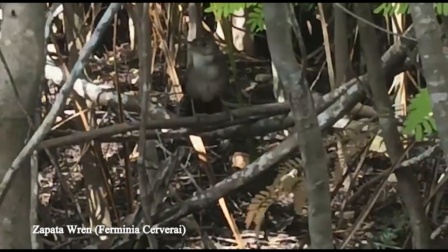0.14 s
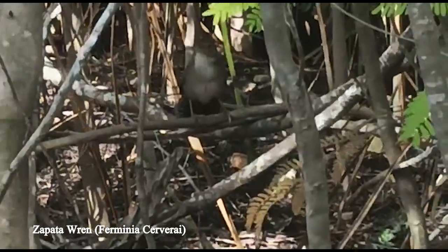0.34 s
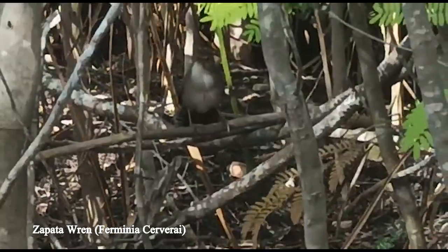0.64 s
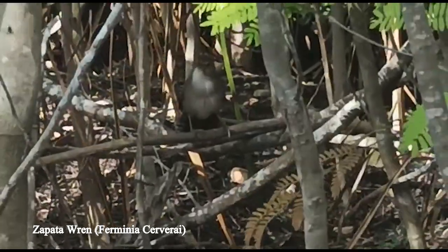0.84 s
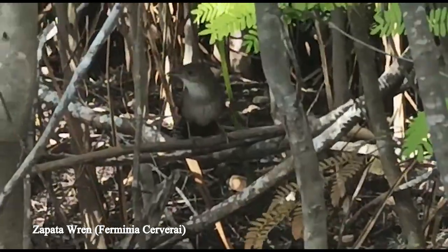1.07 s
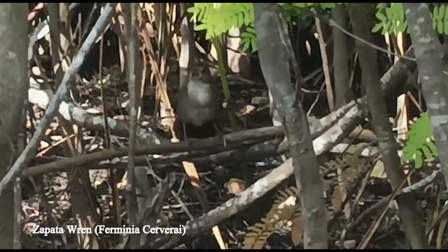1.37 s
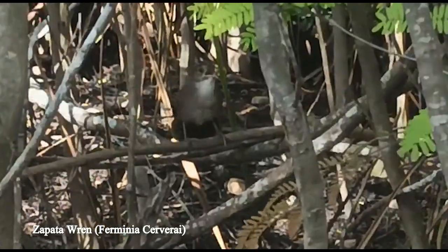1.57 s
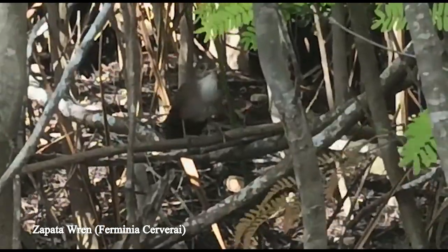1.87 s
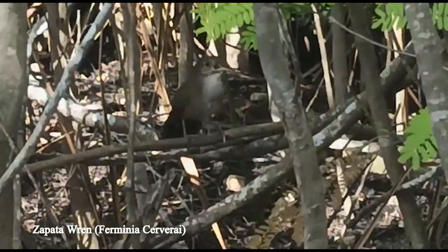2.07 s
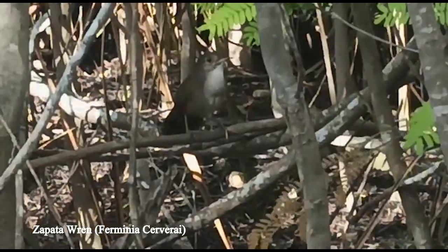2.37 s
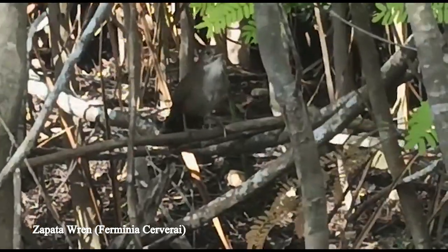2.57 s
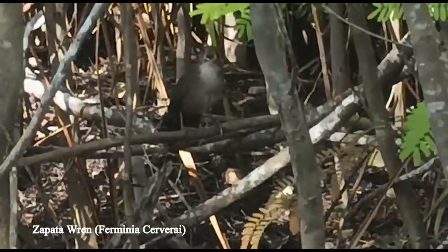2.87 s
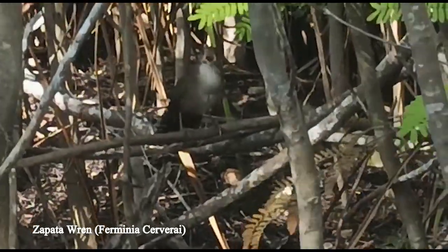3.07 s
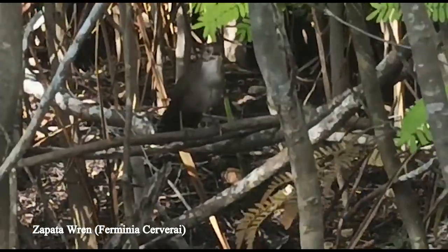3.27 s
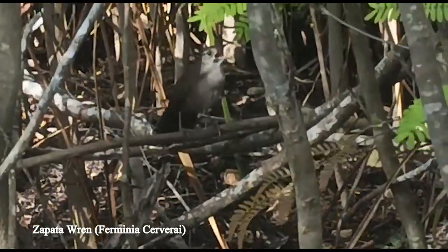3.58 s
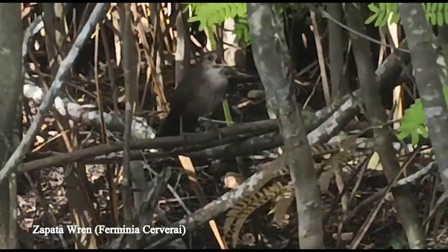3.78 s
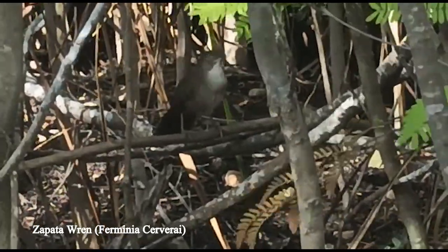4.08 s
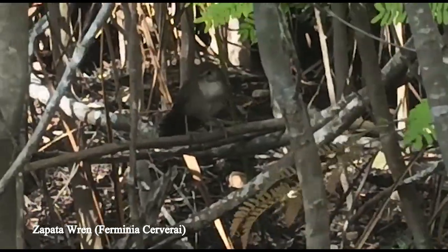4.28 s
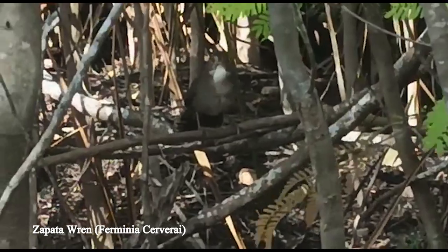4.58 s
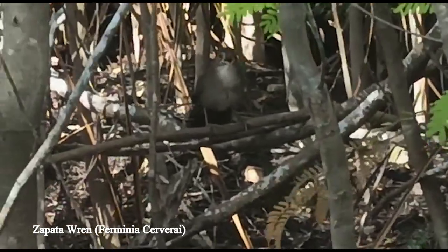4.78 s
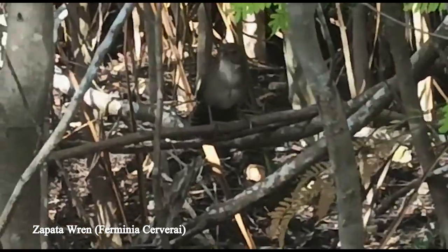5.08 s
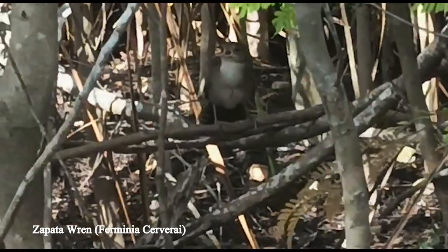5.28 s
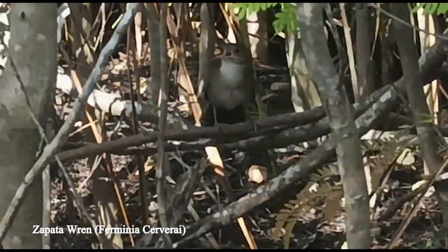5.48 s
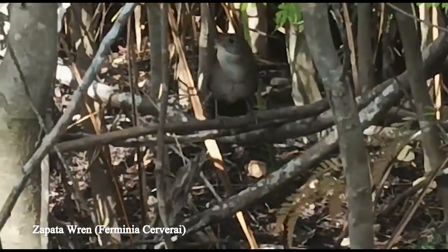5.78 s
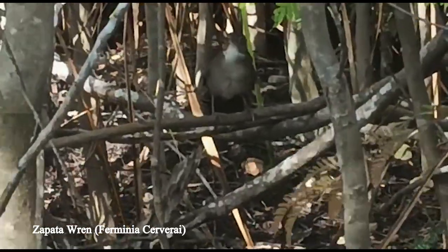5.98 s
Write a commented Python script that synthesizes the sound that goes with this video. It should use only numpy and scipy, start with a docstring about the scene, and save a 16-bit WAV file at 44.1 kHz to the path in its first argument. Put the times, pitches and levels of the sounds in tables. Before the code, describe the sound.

A small songbird close to the microphone in dry woodland. A reedy falling note and a rising whistle come first, then a rapid rattle of a dozen harsh pulses. After a pause come a nasal note, two falling whistles, two rasping buzzes, another pause, a reedy squeak, a dropping whistle, a purring trill and two sharp swoops. Dry twig ticks, faint hiss and low rumble surround it.

```python
"""In a dry thicket a small bird sings close by: whistles, reedy notes, a rattle, two buzzes and a trill.
Whistles and reedy notes are sums of gliding harmonics; rasp and buzz are dense random clicks, filtered
and gated; the rattle and trill mix both. Dying sines make twig ticks. Branches throw short echoes and a
brief tail. Shaped noise gives distant rumble and a faint insect-like hiss, with two soft thuds."""
import sys
import numpy as np
from scipy import signal
from scipy.fft import rfft, irfft, next_fast_len
from scipy.io import wavfile
from scipy.ndimage import uniform_filter1d

SR = 44100
rng = np.random.default_rng(int(sys.argv[2]) if len(sys.argv) > 2 else 0)


def persist_wave(psi):
    """Save psi, clipped to +-1, as 16-bit WAV."""
    counts = np.round(np.clip(psi, -1, 1) * 32767).astype(np.int16)
    wavfile.write(sys.argv[1], SR, np.atleast_2d(counts).T)


N = 270774
T = np.arange(N) / SR
CUTOFF_HZ = 15800   # harmonics above this are left out

# spectrum of the harsh flutter in rattle and trill: frequency_hz, relative_density_db (dB per Hz)
RASP_SPECTRUM = [(760, -60), (1300, -55), (2450, -13.5), (2780, -26), (3500, -8.5), (5700, 1.5), (6880, 4),
                 (8290, -9.5), (10300, -25), (15600, -29.5)]


def from_db(db):
    """Level in decibels to amplitude ratio."""
    return 10 ** (np.asarray(db) / 20)


def rms_one(x):
    """Normalise the mean power: scale to rms 1."""
    return x / np.sqrt(np.mean(x ** 2) + 1e-20)


def at_hz(points, hz):
    """Interpolate a spectrum in decibels over logarithmic frequency."""
    point_hz, point_db = np.transpose(points)
    return np.interp(np.log(np.maximum(hz, 1)), np.log(point_hz), point_db)


def coloured(x, points):
    """Linear filtering: multiply the spectrum of x by a magnitude curve."""
    size = next_fast_len(N)
    gain = from_db(at_hz(points, np.fft.rfftfreq(size, 1 / SR)))
    return irfft(rfft(x, size) * gain, size)[..., :N]


def drift(rate_hz, size):
    """Band-limited random fluctuation: low-passed white noise of rms 1."""
    settle = 2000   # samples dropped while the filter settles
    white = rng.standard_normal(size + settle)
    return rms_one(signal.lfilter(*signal.butter(2, rate_hz, fs=SR), white)[settle:])


def span(rows, fade_s=0.0052):
    """Piecewise-linear contours: sample range, edge fade and interpolated columns of one note."""
    s, *columns = np.transpose(rows)
    at = slice(round(s[0] * SR), min(round(s[-1] * SR), N))
    since_start = T[at] - s[0] + (s[0] < fade_s)   # no fade-in for a note already sounding at time zero
    fade = np.clip(np.minimum(since_start, s[-1] - T[at]) / fade_s, 0, 1)
    return at, fade, [np.interp(T[at], s, c) for c in columns]


def smooth_glide(hz):
    """Continuity of pitch: a 5 ms moving average rounds the corners of a contour."""
    return uniform_filter1d(hz, size=220, mode="nearest")


def throb(first_s, per_s, hurry, shape, t, jitter):
    """Periodic modulation: a template repeated on a beat that settles to a steady rate."""
    gained, within_s = hurry
    counted = per_s * (t - first_s) + gained * (1 - np.exp(-(t - first_s) / within_s))
    share = (counted + jitter + .5) % 1 - .5
    template_share, *columns = np.transpose(shape)
    return [np.interp(share, template_share, c) for c in columns]


def partials(pitch_hz, gains, waver):
    """Harmonic series: sines at multiples of one wavering pitch, power normalised by the gains."""
    phase = 2 * np.pi * np.cumsum(pitch_hz * (1 + waver * drift(160, len(pitch_hz)))) / SR
    tones = 0
    for k, gain in enumerate(gains, 1):
        tones = tones + gain * np.sin(k * phase) * (k * pitch_hz < CUTOFF_HZ)
    return tones / np.sqrt(sum(gain ** 2 for gain in gains) / 2)


def chaos(spectrum):
    """Chaotic flutter of the syrinx: dense uneven clicks, filtered, with the short-term power evened out."""
    click_here = rng.random(N) < 9000 / SR   # about 9000 clicks per second
    clicks = click_here * from_db(2 * rng.standard_normal(N)) * rng.choice([-1, 1], N)
    flutter = coloured(clicks, spectrum)
    return rms_one(flutter / np.sqrt(uniform_filter1d(flutter ** 2, size=60)))


def fall(start, slide, end, start_hz, top_hz, low_hz, slide_s, db):
    """Exponential approach to a held pitch, then a hyperbolic-secant slide; one row a millisecond."""
    # loudness along the slide: share_still_to_go, level_db
    loudness = [(0, 0.5), (.1, 5), (.3, 0.5), (.45, -5), (.8, -0.5), (1, -1)]
    climb_s = 0.02
    s = np.arange(start, end, .001)
    held = top_hz - (top_hz - start_hz) * np.exp(-(s - start) / climb_s)
    to_go = 1 / np.cosh(np.maximum(s - slide, 0) / slide_s)
    pitch_hz = low_hz + (held - low_hz) * to_go
    return np.transpose([s, pitch_hz, db + np.interp(to_go, *np.transpose(loudness))])


def swoop(plunge, rise, start_hz, db):
    """Time scaling: lead-in pip and rise stretch to their own length, the plunge and rebound do not."""
    # level pip at the start pitch: share_of_rise_still_to_go, relative_level_db
    pip = [(0.97, -4), (.91, -6.5), (.84, -20)]
    # climb to the peak: share_of_rise_still_to_go, pitch_hz, relative_level_db
    climb = [(.76, 5650, 2), (0.45, 6700, 1), (.28, 7210, -4.5), (0.13, 7200, -15)]
    # plunge and rebound: after_plunge_s, pitch_hz, relative_level_db
    drop = [(0, 6890, 2), (.006, 4820, -1), (.013, 3010, -6.5), (.022, 2404, -16.5), (.034, 2020, -16),
            (.054, 2286, -19), (.074, 2490, -6), (.088, 2475, -6.5), (.106, 2500, -22)]
    lead_in = [(share, start_hz, pip_db) for share, pip_db in pip]
    up = np.multiply(lead_in + climb, [-rise, 1, 1])
    return np.vstack([up, drop]) + [plunge, 0, db]


def whistles():
    """Nearly pure tones: frequency-modulated harmonic series with weak overtones."""
    # a scoop and a sag, one list a note: time_s, pitch_hz, level_db
    single_whistles = [
        [(0.288, 3340, -21), (0.315, 3250, -20.5), (0.345, 3080, -21), (0.37, 3187, -20), (0.406, 3616, -18),
         (0.438, 3944, -22.5), (0.468, 4680, -26)],
        [(5.013, 4130, -30.5), (5.02, 2970, -33), (5.028, 3250, -18), (5.076, 2898, -23.5),
         (5.146, 2686, -25.5), (5.192, 2460, -32), (5.218, 2300, -54)],
    ]
    # falling whistles: start_s, slide_s, end_s, start_hz, top_hz, low_hz, slide_time_s, level_db
    falling_whistles = [(2.896, 3.016, 3.134, 5154, 5704, 3054, 0.025, -22),
                        (3.197, 3.268, 3.402, 5280, 5524, 3047, 0.037, -21)]
    # swoops that rise, plunge and rebound: plunge_s, rise_s, start_hz, level_db
    swooping_whistles = [(5.854, 0.08, 5340, -20.5), (6.086, 0.069, 5080, -18.5)]
    # partials 1 to 6: relative_level_db
    overtones_db = [2, -36.5, -42.5, -53.5, -38.5, -47]
    out = np.zeros(N)
    contours = single_whistles + [fall(*row) for row in falling_whistles]
    contours += [swoop(*row) for row in swooping_whistles]
    for rows in contours:
        at, fade, (hz, db) = span(rows)
        out[at] += fade * from_db(db) * partials(smooth_glide(hz), from_db(overtones_db), waver=.003)
    return out


def throat(pitch_hz, centre_hz, level_db, count=15):
    """Source and filter: a falling series through a tuned throat, plus the beak's bright resonance."""
    # thin resonance growing with effort: centre_hz, width_hz, level_db, growth (dB per dB)
    beak = (12996, 2802.5, -48.5, 0.5)
    q, slope_db = 4.22, -2.5   # throat sharpness, fall per partial
    beak_hz, width_hz, beak_db, effort = beak
    bright = from_db(beak_db + effort * (level_db + 25))
    gains = []
    for k in range(1, count + 1):
        r = k * pitch_hz / centre_hz
        tuned = from_db(slope_db * (k - 2.0)) * r / (q ** 2 * (1 - r * r) ** 2 + r * r)
        gains.append(tuned + bright * np.exp(-((k * pitch_hz - beak_hz) / width_hz) ** 2))
    return gains


def reedy_notes():
    """Moving formant: a rich harmonic series whose throat resonance glides apart from its pitch."""
    # one list a note: time_s, pitch_hz, level_db, throat_resonance_hz
    reedy_contours = [
        [(0.0, 2303, -31, 4570), (0.03, 2010, -27.5, 4200), (0.046, 1645, -21.5, 3370),
         (0.062, 1374, -33, 2880), (0.11, 1357, -27.5, 2740), (0.136, 1381, -44, 2760)],
        [(2.546, 1064, -41, 3800), (2.559, 1291, -24.5, 3930), (2.634, 1107, -28.5, 3420),
         (2.668, 1057, -25, 3250), (2.685, 1035, -29.5, 3410), (2.78, 1022, -32.5, 3420),
         (2.798, 975, -33, 3240), (2.81, 865, -36, 2970)],
        [(4.638, 1027, -45.5, 3770), (4.65, 1264, -35, 4500), (4.664, 1395, -30, 4130),
         (4.698, 1321, -32, 3150), (4.714, 1435, -47.5, 2480), (4.736, 2050, -39, 2060),
         (4.748, 2080, -37, 2120), (4.786, 2295, -40.5, 3800), (4.838, 2257, -30.5, 4760),
         (4.862, 2305, -29, 4200), (4.896, 2383, -30.5, 4320), (4.914, 2450, -42, 4450)],
    ]
    out = np.zeros(N)
    for rows in reedy_contours:
        at, fade, (hz, db, centre) = span(rows)
        glide = smooth_glide(hz)
        out[at] += fade * from_db(db) * partials(glide, throat(glide, centre, db), waver=.002)
    return out


def creaks():
    """Random amplitude and frequency modulation: a lumpy tone between the partials of a note."""
    # rough creaks inside notes: start_s, end_s, pitch_hz, level_db
    creak_rows = [(2.592, 2.644, 2940, -44.5), (4.759, 4.888, 3620, -49.5)]
    out = np.zeros(N)
    for start, end, hz, db in creak_rows:
        at, fade, _ = span([(start,), (end,)], fade_s=0.022)
        lumpy = from_db(db + 4.0 * drift(150, len(fade)))
        out[at] = fade * lumpy * partials(hz + 0 * fade, [1], waver=0.083)
    return out


def rattle():
    """Tone and noise in sequence: a lumpy rising "tuk", then a "tsh" of flutter; a second voice falls in both."""
    # syllables: tuk_s, tuk_level_db, tuk_pitch_hz, tsh_delay_ms
    syllables = [(1.3386, -22, 4150, 24.2), (1.413, -19, 3570, 26.8), (1.4928, -17.5, 3650, 27.6),
                 (1.5727, -16.5, 3534, 28), (1.653, -16.5, 3470, 28.6), (1.733, -16.5, 3450, 29.8),
                 (1.81, -16, 3490, 27.7), (1.8893, -16, 3650, 29), (1.9665, -16.5, 3483, 29),
                 (2.0527, -15.5, 3525, 28.7), (2.1322, -18, 3490, 29.6), (2.2211, -17.5, 3480, 29.8)]
    # contour of a tuk: time_s, relative_level_db, pitch_ratio
    tuk_shape = [(-.002, -33, 0.924), (-.0002, -6.5, 1.002), (.0015, -3, 0.997), (.0032, -14.5, 0.98),
                 (.005, -9, 1.0), (.01, -4.5, 1.02), (.013, -14, 1.1), (.017, -28, 1.15)]
    # flutter within a tuk: frequency_hz, relative_density_db (dB per Hz)
    tuk_spectrum = [(1200, -55), (2000, -11), (3300, 3.5), (4400, -4), (5600, -8.5), (7500, -23),
                    (9500, -26), (13000, -27), (15700, -61)]
    # contour of a tsh: time_s, relative_level_db
    rasp_shape = [(-.002, -12.5), (.001, -5.5), (.005, -4), (.014, -11.5), (.021, -24), (.026, -40)]
    # second voice: time_s, level_db, pitch_hz
    hook_shape = [(-.002, -42, 3800), (0, -30.5, 3350), (.003, -39.5, 2750), (.007, -44.5, 2253),
                  (.014, -52.5, 1700), (.02, -62, 1670)]
    wobble_hz, wobble_depth = 394, 0.23
    tuk_flutter_db, rasp_db = -9.5, -17.5
    out, low, high = np.zeros((3, N))
    for s, tuk_db, hz, after_ms in syllables:
        at, fade, (db, ratio) = span(np.add(tuk_shape, [s, tuk_db, 0]), fade_s=0.0014)
        wobble = 1 + wobble_depth * np.sin(2 * np.pi * wobble_hz * (T[at] - s))
        lumps = wobble * from_db(1.5 * drift(369.4, len(db)))
        tone = partials(hz * ratio, from_db([0, -24, -38]), waver=0.032)
        out[at] += fade * lumps * from_db(db) * tone
        low[at] += fade * from_db(db + tuk_flutter_db)
        rasp = s + after_ms / 1000
        at, fade, (db,) = span(np.add(rasp_shape, [rasp, rasp_db]), fade_s=0.00067)
        high[at] += fade * from_db(db)
        for half in (s, rasp):
            at, fade, (db, hook_hz) = span(np.add(hook_shape, [half, 0, 0]), fade_s=0.00114)
            out[at] += fade * from_db(db) * partials(hook_hz, [1], waver=0.039)
    return out + low * chaos(tuk_spectrum) + high * chaos(RASP_SPECTRUM)


def buzzes():
    """Amplitude modulation: flutter gated about 65 times a second under attack, slight sag and release."""
    # buzzes: start_s, end_s, level_db, first_throb_s, throbs_per_s
    buzz_rows = [(3.466, 3.71, -21, 3.4757, 64.7), (3.759, 4.003, -20.5, 3.7672, 63.0)]
    # one throb: share_of_throb, relative_level_db
    throb_shape = [(-.5, -20), (-.3, -14.5), (-.22, -2), (.1, 0), (.3, -13), (.4, -20), (.5, -18)]
    # flutter: frequency_hz, relative_density_db (dB per Hz)
    buzz_spectrum = [(800, -76), (1400, -46), (1900, -21.5), (2600, -16.5), (3300, -13.5), (4100, -13),
                     (4900, -12.5), (7250, 3), (8500, -6.5), (9500, -22.5), (10400, -31.5), (13700, -29.5),
                     (15600, -35)]
    # the first throbs come quicker: throbs_gained, within_s
    hurry = (0.2, 0.024)
    attack_s, release_s, edge_db, sag_db = 0.014, 0.019, -7.5, -1.5
    envelope = np.zeros(N)
    for start, end, level_db, first_s, per_s in buzz_rows:
        at, fade, (db,) = span([(start, edge_db), (start + attack_s, 0),
                                (end - release_s, sag_db), (end, edge_db)])
        throb_db = throb(first_s, per_s, hurry, throb_shape, T[at], jitter=0)[0]
        envelope[at] = fade * from_db(level_db + db + throb_db)
    return envelope * chaos(buzz_spectrum)


def trill():
    """Joint amplitude and pitch modulation: a reedy voice throbs at about 107 Hz, most fluttery at its ends."""
    # whole trill: time_s, pitch_hz, level_db, flutter_db (held to 0 at most)
    contour = [(5.274, 1830, -34.5, 1), (5.3, 1754, -28.5, -6), (5.33, 1740, -28, -13),
               (5.45, 1705, -27.5, -22), (5.64, 1738, -28, -16), (5.674, 1795, -28, -3.5),
               (5.702, 1843, -33, -14)]
    # loudness of one throb: share_of_throb, relative_level_db
    throb_shape = [(-.5, -22), (-.3, -23), (-.12, 2), (0.098, 4), (0.298, 0.5), (.5, -27)]
    # pitch of one throb, mostly falling: share_of_throb, pitch_ratio
    bend_shape = [(-.5, .98), (-.38, 1.05), (-.15, 1.04), (.1, .99), (.33, .91), (.5, .98)]
    # partials 1 to 8: relative_level_db
    overtones_db = [-17, -2.5, 5.5, -2.5, -38, -40, -25.5, -29]
    # the first throbs come slower: throbs_gained, within_s
    hurry = (-1.42, 0.04)
    first_s, per_s = 5.2793, 107.8
    out = np.zeros(N)
    at, fade, (hz, db, flutter_db) = span(contour)
    jitter = 0.036 * drift(50, len(hz))   # in throbs
    throb_db = throb(first_s, per_s, hurry, throb_shape, T[at], jitter)[0]
    ratio = throb(first_s, per_s, hurry, bend_shape, T[at], jitter)[0]
    ratio *= 1 + .007 * drift(45, len(hz))   # no two throbs on quite the same pitch
    voice = partials(hz * ratio, from_db(overtones_db), waver=.006)
    voice += from_db(np.minimum(flutter_db, 0)) * chaos(RASP_SPECTRUM)[at]
    out[at] = fade * from_db(db + throb_db + 1.5 * drift(50, len(hz))) * voice
    return out


def twigs():
    """Damped modal vibration: each dry tick is two quickly dying wood modes and a grainy crack."""
    # ticks: time_s, level_db
    ticks = [(0.0575, -25.5), (0.193, -27), (0.302, -28), (0.4587, -29), (0.5121, -27.5), (0.6717, -23),
             (1.2265, -25.5), (1.2358, -28.5), (1.27, -33.5), (1.5735, -19), (2.9402, -33)]
    low_hz, low_spread = 2660, 0.063   # the low mode varies by this share from tick to tick
    top_hz, top_db, t60_s = 6540, 1, 0.0036
    out, t = np.zeros(N), T[:1500]
    for s, level_db in ticks:
        hz = low_hz * (1 + low_spread * rng.standard_normal())
        ring = np.sin(2 * np.pi * hz * t) + from_db(top_db) * np.sin(2 * np.pi * top_hz * t)
        ring += from_db(-7.5) * drift(4800, len(t))
        onset = np.clip(t / 0.00037, 0, 1)
        out[round(s * SR):][:len(t)] += from_db(level_db - 60 * t / t60_s) * onset * ring
    return out


def thicket(x):
    """Multipath propagation: direct sound, branch echoes and decaying scatter, separate for each channel."""
    # direct paths, one list a channel: delay_ms, gain
    direct_paths = [
        [(0.0014, 0.86)],
        [(.09, 0.75), (.16, -0.27), (.3, 0.33)],
    ]
    # echoes off near branches, one list a channel: delay_ms, relative_gain
    branch_paths = [
        [(1.295, -0.057), (1.55, -0.029), (1.82, -0.12), (2.662, 0.014), (2.798, 0.000083), (3.291, -0.11),
         (3.946, -0.093)],
        [(1.726, 0.058), (2.032, 0.0034), (2.168, -0.092), (2.313, -0.078), (2.664, -0.11), (2.934, -0.035),
         (3.092, -0.06)],
    ]
    # response of each channel: frequency_hz, level_db
    channel_response = [
        [(300, -28), (1000, 5.5), (3500, -0.5), (6000, 2.5), (9000, -4), (10600, -3.5), (13000, -0.5),
         (16000, 0)],
        [(300, -30), (1000, 1.5), (3500, 6), (6000, 0), (9000, 0), (10600, -14), (13000, -14), (16000, -7.5)],
    ]
    # scatter off twigs near the bird and off the far thicket: rise_s, t60_s, level_db
    scatter = [(.001, 0.033, -8), (.008, 0.274, -13)]
    # spectrum of the scatter: frequency_hz, level_db
    scatter_spectrum = [(1500, 0), (3000, -2), (5000, 0), (8000, -0.5), (14000, -2)]
    branch_db = 7
    size = next_fast_len(N + SR // 2)
    hz, t = np.fft.rfftfreq(size, 1 / SR), T[:SR // 2]

    def paths(rows):
        """Delay as linear phase: the summed response of several paths."""
        return sum(g * np.exp(-2j * np.pi * hz * ms / 1000) for ms, g in rows)

    out = []
    for direct, branches, colour in zip(direct_paths, branch_paths, channel_response):
        response = paths(direct) * (1 + from_db(branch_db) * paths(branches))
        for rise_s, t60, db in scatter:
            tail = rng.standard_normal(len(t)) * from_db(-60 * t / t60) * np.clip(t / rise_s, 0, 1)
            tail /= np.sqrt(np.sum(tail ** 2))   # unit energy
            response += rfft(from_db(db) * tail, size) * from_db(at_hz(scatter_spectrum, hz))
        out.append(irfft(rfft(x, size) * response * from_db(at_hz(colour, hz)), size)[:N])
    return np.array(out)


def air():
    """Partly coherent noise: rumble and hiss, mostly unlike in the two channels, swelling a little."""
    # background: frequency_hz, relative_density_db (dB per Hz)
    air_spectrum = [(18, -50.5), (30, -21), (47, -5), (148, -4), (257, -8.5), (300, -9), (342, -9.5),
                    (791, -12.5), (1270, -18), (2310, -15), (3090, -13), (5640, -19), (7140, -10.5),
                    (15600, -60.5)]
    # stereo lean: frequency_hz, left_over_right_db
    balance = [(60, 3), (240, 4), (950, 3), (3770, -4.5), (15000, -5.5)]
    level_db, likeness = -54.5, 0.13   # likeness: share of power common to both channels
    shared, *own = rng.standard_normal((3, N))
    mixed = np.sqrt(likeness) * shared + np.sqrt(1 - likeness) * np.array(own)
    noise = rms_one(coloured(mixed, air_spectrum))
    lean = [coloured(noise[c], np.multiply(balance, [1, .5 - c])) for c in (0, 1)]
    return from_db(level_db + 0.21 * drift(1.7, N)) * np.array(lean)


def bumps():
    """Gaussian-windowed oscillation: short low thuds, alike in both channels."""
    # soft thuds: time_s, level_db
    thuds = [(0.771, -48), (5.269, -46)]
    thud_hz, width_s = 94, 0.01
    out = np.zeros(N)
    for s, db in thuds:
        window = np.exp(-((T - s - width_s) / width_s) ** 2)
        out += from_db(db) * window * np.sin(2 * np.pi * thud_hz * (T - s))
    return out


def scene():
    """Superposition: bird and twigs pass through the thicket, then background and thuds are added."""
    bird = whistles() + reedy_notes() + creaks() + rattle() + buzzes() + trill()
    return thicket(bird + twigs()) + air() + bumps()


def record(dry):
    """Band limiting: a high-pass thins the deep rumble and a steep low-pass removes the top."""
    high_pass = signal.butter(2, 57, "high", fs=SR, output="sos")
    low_pass = signal.cheby2(14, 50, CUTOFF_HZ + 200, fs=SR, output="sos")
    return signal.sosfilt(low_pass, signal.sosfilt(high_pass, dry))


dry = scene()
out = record(dry)
persist_wave(out)
```